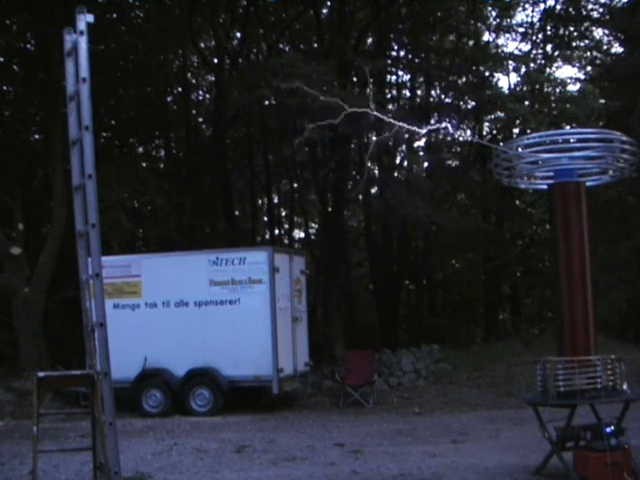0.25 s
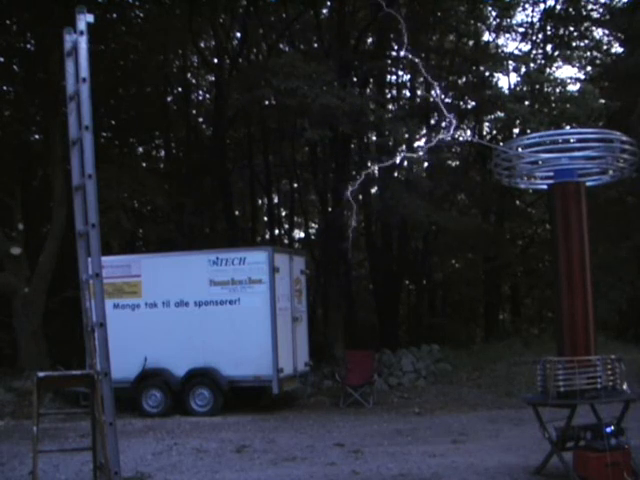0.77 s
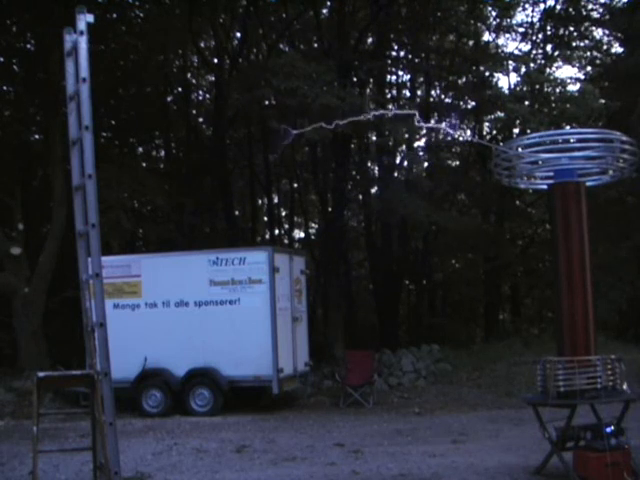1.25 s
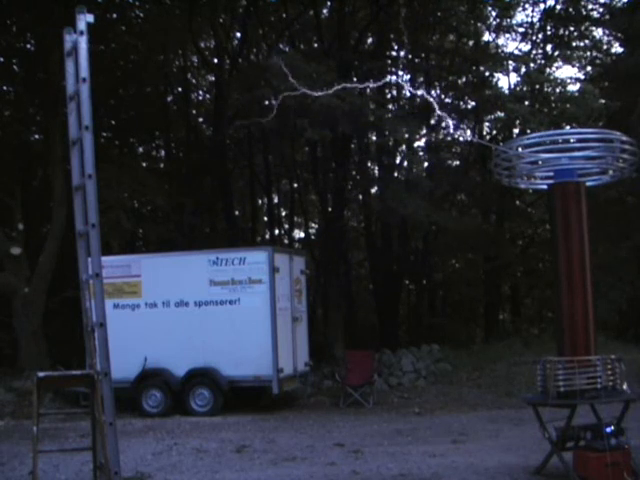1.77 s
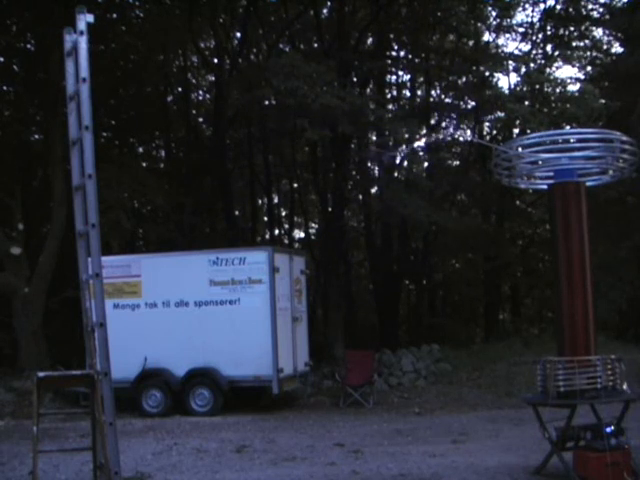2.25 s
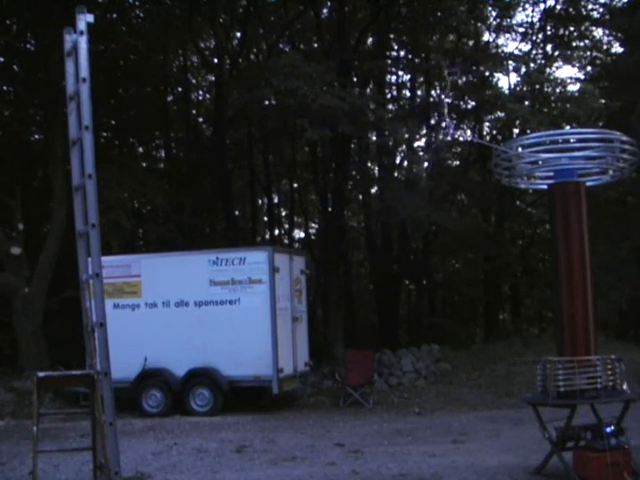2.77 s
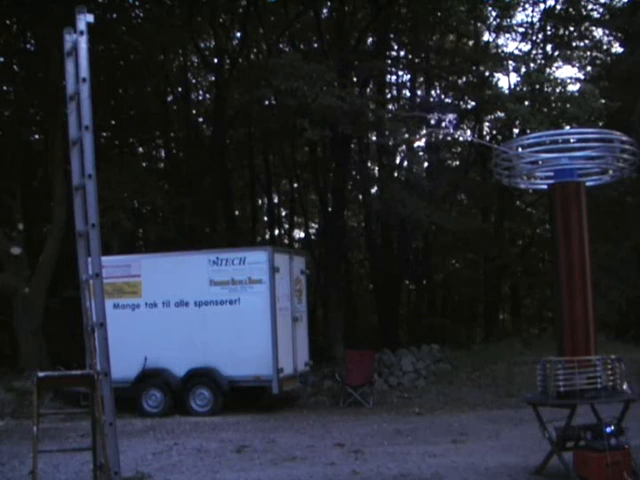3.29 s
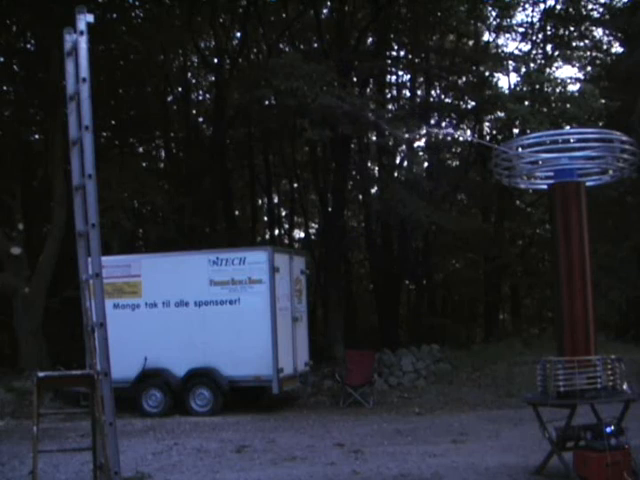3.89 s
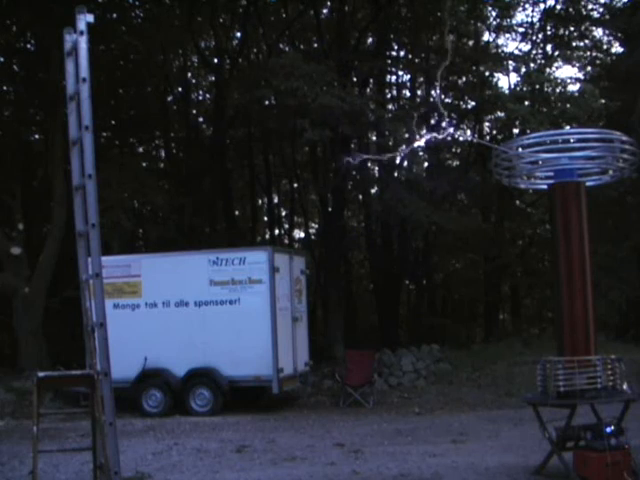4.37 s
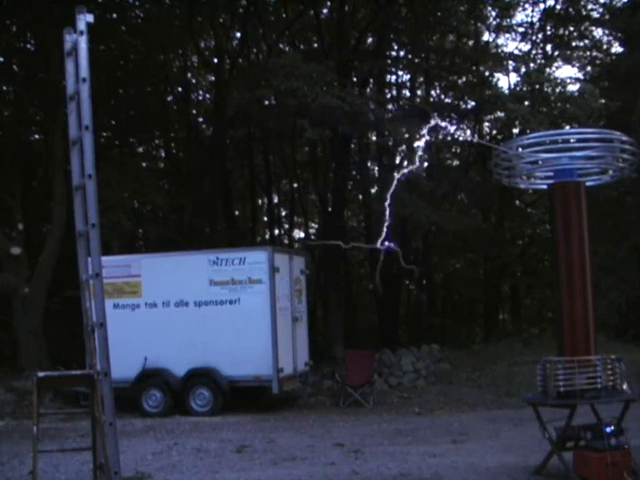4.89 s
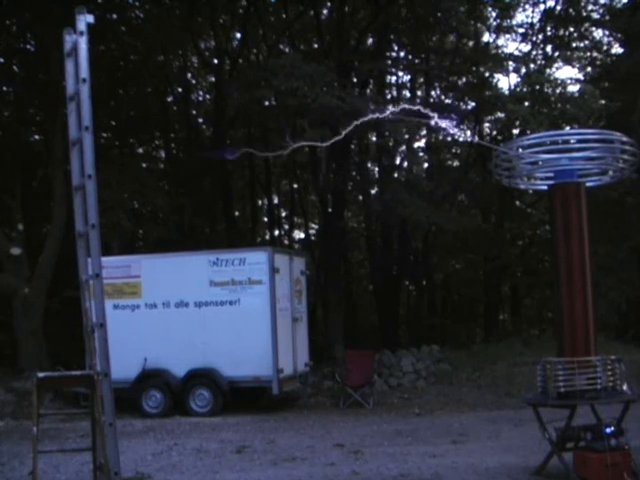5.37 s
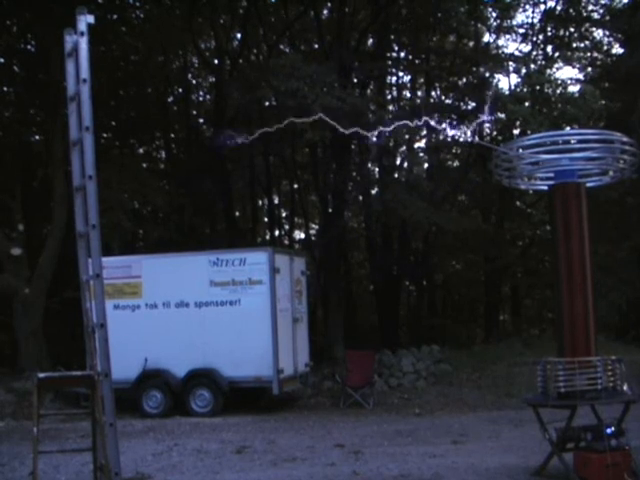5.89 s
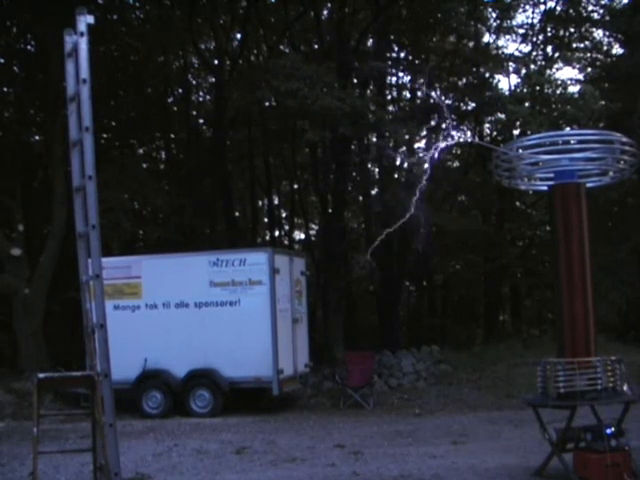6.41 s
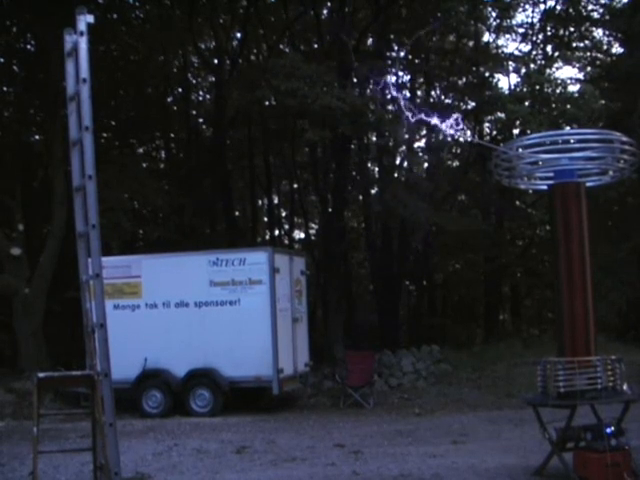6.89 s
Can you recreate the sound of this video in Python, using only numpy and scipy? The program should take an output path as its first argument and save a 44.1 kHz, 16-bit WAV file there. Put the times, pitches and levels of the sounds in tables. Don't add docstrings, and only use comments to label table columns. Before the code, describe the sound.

A large high-voltage coil throws sparks outdoors, giving a loud, harsh, continuous low-pitched electric buzz with sharp crackles and constantly shifting bite.

```python
import sys
import numpy as np
from scipy import signal
from scipy.fft import rfft, irfft, next_fast_len
from scipy.io import wavfile
from scipy.ndimage import map_coordinates

SR = 44100
rng = np.random.default_rng(int(sys.argv[2]) if len(sys.argv) > 2 else 0)


def transcribe(signal):
    frames = np.atleast_2d(signal).T
    limited = np.clip(frames, -1, 1)
    pcm = np.round(limited * 32767).astype(np.int16)
    wavfile.write(sys.argv[1], SR, pcm)


def invert_db(x):
    u = np.asarray(x, float) / 20
    return 10 ** u


N = 315169

FIRE_HZ = 78.091
DRIFT_HZ = 78.22
ROOT_S = .0015
FULL_DB = 2.5
DEEPEN, ROOT_FOLLOWS = 1.706, 0.57
REACH_MS, SHRINK_MS_PER_DB = 2.2, 0.25
ROOT_MEAN_DB = -32
LONGEST_LIFE = 2.4
TOP_HZ = 15750

# start_s, lasts_s, peak_db, width_ms
STRETCHES = [(0.1284, 0.192, -3.3, 0.16), (0.4726, 0.102, -4.6, 0.12), (0.7818, 0.115, -3.4, 0.18),
             (1.2549, 0.064, -4.8, 0.14), (1.436, 0.115, -4.6, 0.11), (1.6145, 0.18, -5.2, 0.12),
             (2.0628, 0.46, -5.0, 0.17), (2.6391, 0.09, -4.6, 0.11), (2.7271, 0.026, -4.9, 0.07),
             (3.0346, 0.013, -3.5, 0.11), (3.1634, 0.051, -5.8, 0.14), (3.2656, 0.154, -4.0, 0.11),
             (3.6251, 0.14, -7.3, 0.12), (3.8808, 0.128, -7.5, 0.16), (4.0083, 0.0, -1.0, 0.13),
             (4.0465, 0.038, -4.3, 0.1), (4.1491, 0.077, -5.3, 0.09), (4.2909, 0.038, -0.5, 0.12),
             (4.3022, 0.026, -1.5, 0.18), (4.4671, 0.013, -4.9, 0.09), (4.5603, 0.051, -3.9, 0.11),
             (4.7226, 0.038, -5.4, 0.16), (5.2241, 0.064, -0.9, 0.16), (5.3534, 0.051, -4.2, 0.11),
             (5.5721, 0.051, -1.3, 0.11), (5.9682, 0.154, -5.5, 0.15), (6.3636, 0.154, -5.5, 0.1),
             (6.5309, 0.077, -3.0, 0.11), (6.7747, 0.051, -3.3, 0.11), (6.9542, 0.064, -5.3, 0.17)]
# centre_s, loss_db, lasts_s
REROUTES = [(0.311, -3.5, 0.088), (0.59, -3.5, 0.11), (0.77, -1.6, 0.041), (0.91, -4, 0.08),
            (1.17, -2.5, 0.065), (1.399, -3, 0.077), (1.569, -3, 0.071), (1.82, -3.0, 0.155),
            (2.179, -4, 0.12), (2.461, -2, 0.15), (2.701, -2.5, 0.032), (2.969, -3, 0.13),
            (3.12, -2.0, 0.069), (3.5, -3, 0.16), (3.69, -3, 0.12), (3.991, -2.5, 0.18), (4.109, -2, 0.088),
            (4.27, -1.5, 0.067), (4.358, -3.5, 0.113), (4.69, -2.5, 0.0984), (5.049, -2.0, 0.07),
            (5.189, -2.5, 0.077), (5.501, -2, 0.095), (5.65, -2.5, 0.063), (6.13, -2.0, 0.11),
            (6.371, -3, 0.036), (6.629, -3, 0.16), (7.05, -1.1, 0.06), (5.93, -1.77, .22),
            (2.84, -2.0, .09)]
# time_s, level_db
ROOT_SWELL = [(0, -31), (.44, -29), (.55, -38.5), (.72, -28), (.95, -29), (1.1, -35), (1.55, -35),
              (1.62, -28), (2.65, -31), (3.1, -35), (3.85, -30), (4.32, -28), (4.42, -36), (5.2, -33),
              (5.83, -27), (5.92, -33), (6.76, -31), (6.88, -37)]
ROOT_HARMONICS = [-55, -60, -48, -52, -42, -46, -40, -45, -47, -38.5, -37.5, -48]
# pitch_hz, level_db
TREE_TONE = [(60, 19), (300, -1), (1000, -1), (3000, -0.5), (8000, 1), (15000, -1.5)]
# pitch_hz, t60_s
TREE_DECAY = [(200, 0.62), (2000, 0.61), (10000, 0.3)]
# pitch_hz, level_db
YARD_TONE = [(20, -15), (60, -10), (110, -8.5), (200, -2.5), (400, 2.5), (800, -120)]
# pitch_hz, level_db
MIC_TONE = [(100, 6), (240, 4.5), (320, 8.5), (500, -2), (650, -0.5), (810, -3.5), (1050, -7), (1250, -5.5),
            (1800, -2), (3000, -0.5), (6000, 3), (10000, 5), (13000, 5), (15700, -1.5)]
# pitch_hz, lead_radians
PORT_LEAD = [(60, 1.8), (260, 1.6), (950, .8), (2840, .3), (8000, .45)]
# pitch_hz, left_minus_right_db
PORT_BALANCE = [(60, -1.0), (130, -2.5), (290, -3.5), (640, -1.5), (1410, 0.0), (3100, -0.5), (6820, 0.0),
                (15000, -0.5)]


def spark():
    stretches = refire(*np.transpose(STRETCHES), scatter_db=1.9, jitter_ms=.016, spread_ms=.01, ground_db=-6.5)
    elbows = branches(count=240, life_s=.03, db=-11, range_db=1.7, width_ms=0.13, follows=1.1, yield_db=4,
                      scatter_db=3.0, jitter_ms=0.022, spread_ms=0.015, ground_db=-7.0)
    bows = branches(count=400, life_s=.04, db=-22.5, range_db=2.5, width_ms=0.25, follows=0.84, yield_db=1.5,
                    scatter_db=2.0, jitter_ms=0.033, spread_ms=0.016, ground_db=2.0)
    bends = branches(count=2600, life_s=.028, db=-21.5, range_db=2.5, width_ms=0.11, follows=0.53, yield_db=1.4,
                     scatter_db=0.5, jitter_ms=0.047, spread_ms=0.022, ground_db=-1)
    twigs = branches(count=10000, life_s=.004, db=-22.5, range_db=4.5, width_ms=0.047, follows=0.57,
                     yield_db=1.36, scatter_db=0.97, jitter_ms=0.021, spread_ms=0.031, ground_db=0.5)
    return invert_db(1.0) * stretches + elbows + bows + bends + twigs


def branches(count, life_s, db, range_db, width_ms, yield_db, **how):
    u = rng.random((count, 3))
    g = rng.standard_normal((count, 3))
    born = (np.arange(count) + u[:, 0]) / count
    fired_s = np.floor(born * (N / SR + .3) * FIRE_HZ - .3 * FIRE_HZ) / FIRE_HZ
    reach_ms = np.maximum(REACH_MS + SHRINK_MS_PER_DB * alight_db(fired_s), .5)
    lead_ms = 2 * u[:, 1] * reach_ms + 0.415 * g[:, 0]
    lasts_s = life_s * np.minimum(-np.log(u[:, 2]), LONGEST_LIFE)

    middle_s = fired_s + lasts_s / 2
    robbed = np.zeros(count, bool)
    for start_s, span_s, *_ in STRETCHES:
        after = middle_s > start_s - 1 / FIRE_HZ
        before = middle_s < start_s + span_s + 1 / FIRE_HZ
        robbed |= after & before

    size_db = db + FULL_DB - yield_db * robbed + range_db * np.clip(g[:, 1], -3, 2.3)
    widths_ms = width_ms * np.exp(.35 * g[:, 2])
    return refire(fired_s + ROOT_S - lead_ms / 1000, lasts_s, size_db, widths_ms, **how)


def refire(first_s, lasts_s, db, width_ms, scatter_db, jitter_ms, spread_ms, ground_db, follows=0):
    shots = np.round(lasts_s * DRIFT_HZ).astype(int) + 1
    kink = np.repeat(np.arange(len(shots)), shots)
    count = np.arange(len(kink)) - np.repeat(np.cumsum(shots) - shots, shots)
    place = rng.standard_normal((len(shots), 3))[kink]
    luck = rng.standard_normal((len(kink), 3))
    lag_ms = 0.012 + spread_ms * place[:, 0]
    pan_db = 4.4 * place[:, 1]
    s = first_s[kink] + count / DRIFT_HZ + jitter_ms / 1000 * luck[:, 0]
    level_db = db[kink] + follows * alight_db(s) + scatter_db * luck[:, 1]
    direct = cracks(s, level_db, width_ms[kink], lag_ms, pan_db)

    ground_ms = 2.66 + .08 * place[:, 2]
    bounce_db = level_db + ground_db + 1.1 * luck[:, 2]
    bounce_ms = 2.01 * width_ms[kink]
    bounce = cracks(s + ground_ms / 1000, bounce_db, bounce_ms, lag_ms, pan_db, turn=-1)
    return direct + bounce


def cracks(s, db, width_ms, lag_ms, pan_db, turn=1, size=64):
    out = []
    sigma = np.clip(width_ms, .03, .3)[:, None] * SR / 2000
    for side in (1, -1):
        centre = (s + side * lag_ms / 2000)[:, None] * SR - turn * sigma
        at = np.round(centre).astype(int) + np.arange(-size // 2, size // 2)
        u = turn * (at - centre) / sigma
        slow = np.where(u < 0, 1.8, 1)
        shape = -u / slow ** 2 * np.exp((1 - (u / slow) ** 2) / 2)
        wave = shape * invert_db(db + side * pan_db / 2)[:, None]
        inside = (at >= 0) & (at < N)
        out.append(np.bincount(at[inside], wave[inside], N))
    return np.array(out)


def alight_db(s):
    at_s, loss_db, lasts_s = np.transpose(REROUTES)
    grid = np.arange(-.5, N / SR + .5, .002)
    bells = np.exp(-(2 * (grid[:, None] - at_s) / lasts_s) ** 2)
    loss = (loss_db * bells).sum(axis=1)
    return np.interp(s, grid, DEEPEN * loss)


def thump():
    t = np.arange(N) / SR
    swell_db = np.interp(t, *np.transpose(ROOT_SWELL)) - ROOT_MEAN_DB + ROOT_FOLLOWS * alight_db(t) + 2.5
    phase = 2 * np.pi * FIRE_HZ * (t - ROOT_S) + .12 * wobble(5)
    flicker_db = 1.8 * wobble(16)
    hum = np.zeros(N)
    for k, db in enumerate(ROOT_HARMONICS, 1):
        level_db = db + min(k / 7, 1.4) * swell_db + flicker_db + 2.4 * wobble(8)
        hum += invert_db(level_db) * np.sin(k * phase + .5 * wobble(4))
    return np.minimum(t / .03, 1) * hum


def trees(x, count=40):
    hz, t, z = signal.stft(rng.standard_normal((count + 1, 2, SR // 3)), SR, nperseg=256)
    fade_db = along(TREE_TONE, hz)[:, None] - 60 * t / along(TREE_DECAY, hz)[:, None]
    tails = signal.istft(z * invert_db(fade_db), SR, nperseg=256)[1]
    tails = 0.49 * tails[:, :1] + 0.96 * tails
    step = N // count + 1
    out = np.zeros((2, 2 * N))
    padded = np.pad(x, ((0, 0), (step, 2 * step)))
    for k, tail in enumerate(tails):
        piece = padded[:, k * step:(k + 2) * step] * np.sqrt(np.hanning(2 * step))
        answer = signal.fftconvolve(piece, tail / np.linalg.norm(tail[0]), axes=1)
        out[:, k * step:k * step + answer.shape[1]] += answer
    return out[:, step - 200:step - 200 + N]


def yard():
    lumpy = rng.standard_normal(N) * invert_db(2.0 * wobble(25))
    air = filtered(lumpy, lambda hz: invert_db(along(YARD_TONE, hz)))
    return invert_db(-53.0) * air / np.std(air)


def wobble(rate):
    knots = rng.standard_normal(int(N * rate / SR) + 4)
    return map_coordinates(knots, [np.arange(N) * rate / SR])


def filtered(x, response):
    m = next_fast_len(N + SR // 2)
    return irfft(rfft(x, m) * response(np.fft.rfftfreq(m, 1 / SR)), m)[..., :N]


def along(points, hz):
    f, v = np.transpose(points)
    return np.interp(np.log(hz + 1), np.log(f + 1), v)


def scene():
    near = filtered(spark(), lambda hz: hz ** 4 / (hz ** 4 + 480 ** 4))
    return near + invert_db(-2.5) * trees(near) + thump() + yard()


def band_limit(x):
    return signal.sosfilt(signal.butter(12, 15750, fs=SR, output="sos"), x)


def record(dry):
    mid = dry.mean(axis=0)
    side = filtered(dry[0] - mid, lambda hz: hz ** 2 / (hz ** 2 + 700 ** 2))

    def port(hz):
        return invert_db(along(PORT_BALANCE, hz) / 2 - 0.37) * np.exp(.5j * along(PORT_LEAD, hz))

    def colour(hz):
        return invert_db(along(MIC_TONE, hz)) * (hz < TOP_HZ) * np.array([port(hz), 1 / port(hz)])

    heard = filtered(np.array([mid + side, mid - side]), colour)
    heard = heard / (1 + np.abs(heard / .82) ** 5) ** (1 / 5)
    return band_limit(heard)


dry = scene()
out = record(dry)
transcribe(out)
```